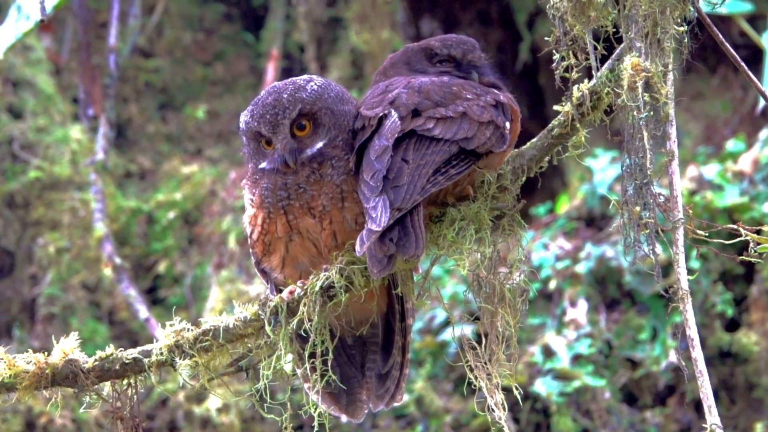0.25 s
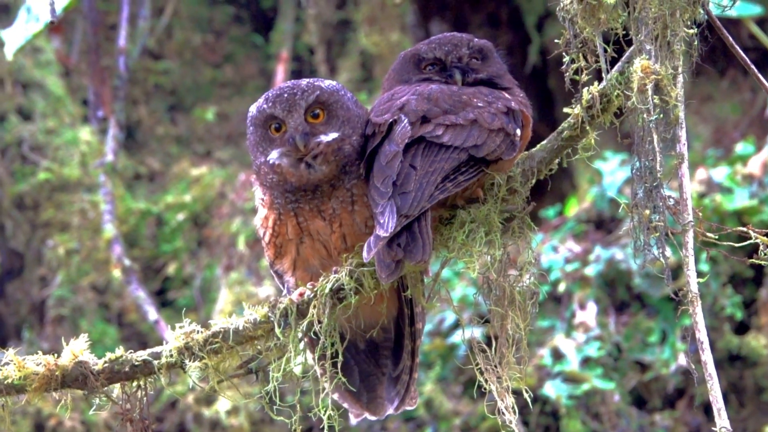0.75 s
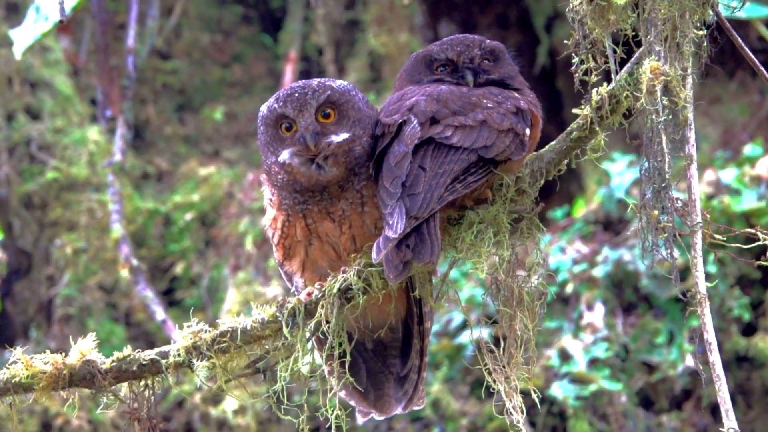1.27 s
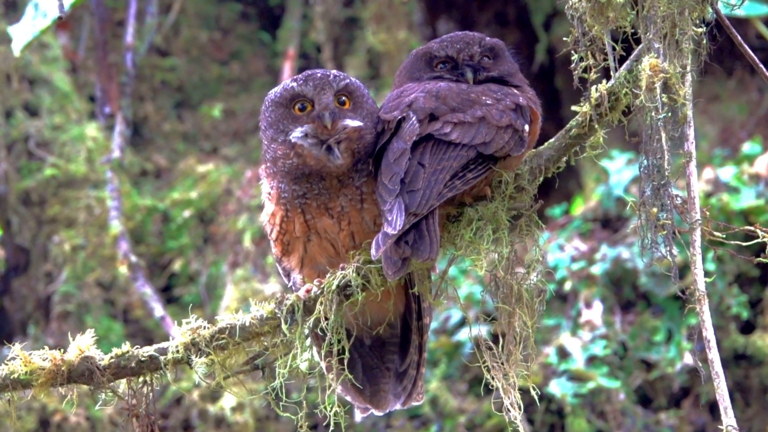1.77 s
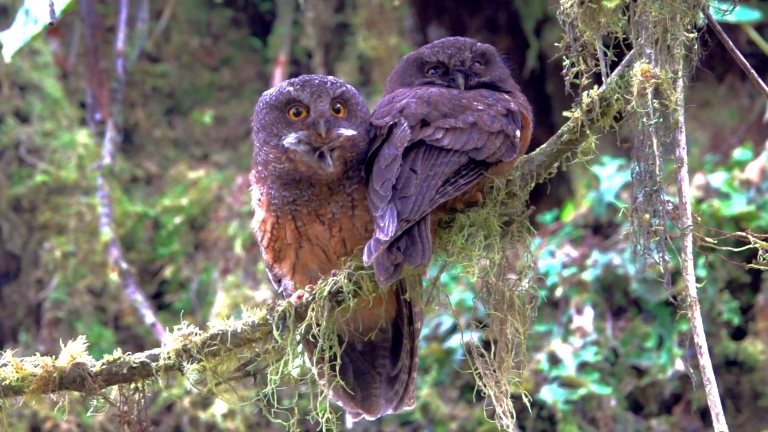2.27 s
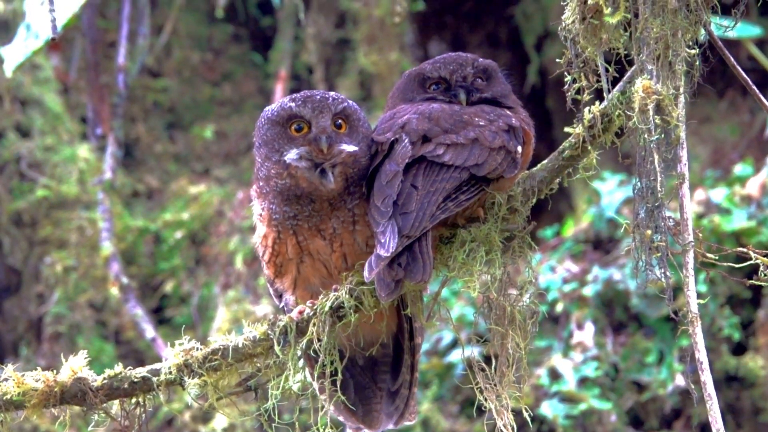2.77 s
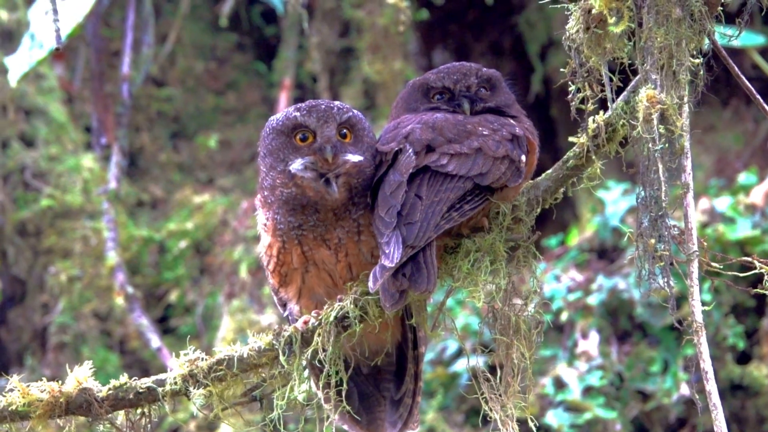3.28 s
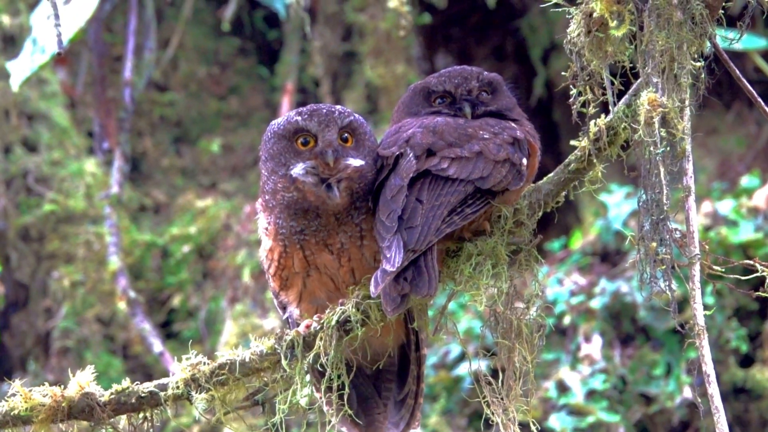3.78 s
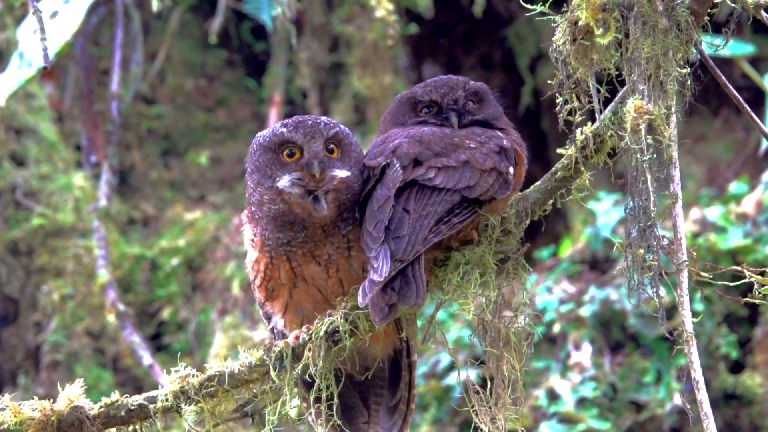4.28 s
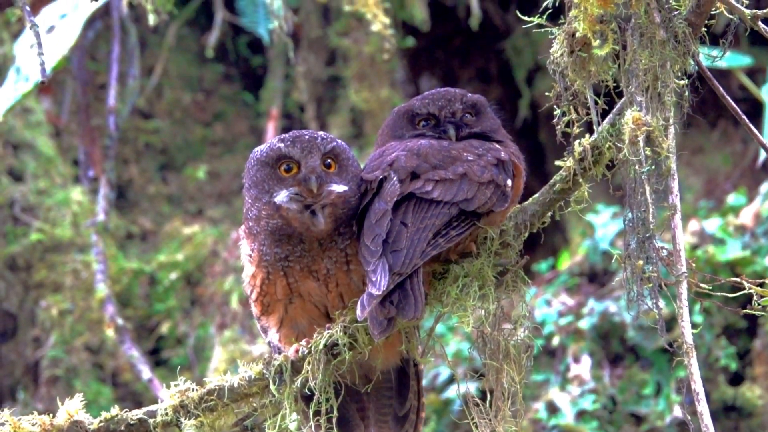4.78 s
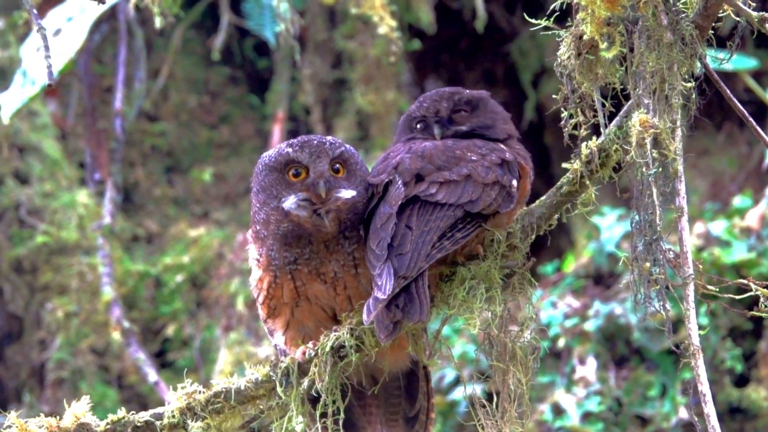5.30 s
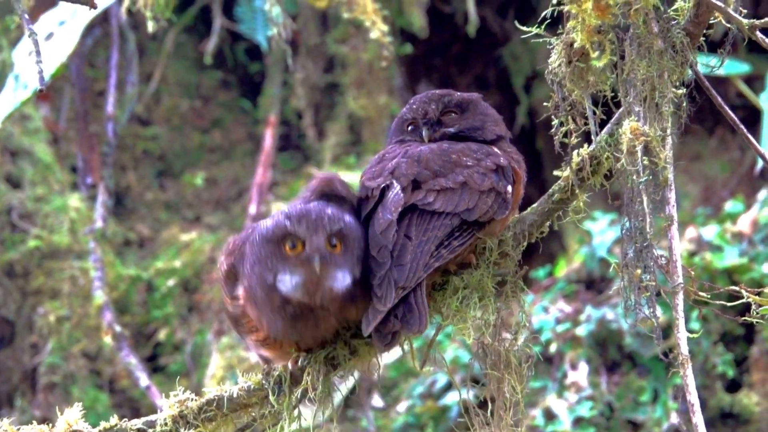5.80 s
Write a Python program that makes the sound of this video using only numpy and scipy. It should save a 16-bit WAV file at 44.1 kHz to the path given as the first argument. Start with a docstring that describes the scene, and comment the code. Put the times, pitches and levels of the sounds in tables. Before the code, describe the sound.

In a quiet forest, a short rustle with small dry knocks opens the scene. A small owl then begins soft, hollow double hoots, about four pairs a second, growing steadily louder and holding strong. Early on, a distant bird adds very high thin whistles and buzzy chips. The hoots end with one weak single note. Heard fairly close outdoors, with slight echoes from the trees.

```python
"""A steady forest wash with two fuzzy low hums opens under shaped-noise rustles, decaying knocks and clicks.
A small owl enters with a series of double hoots that grows louder: gliding sines that crack into a second
tone, with echoes and scatter. Around its first hoots a far bird adds buzzy chips of filtered noise and thin
wavering sine whistles. The owl ends on one soft single note; after it come a faint rustle and
the bird's last chips and whistle over the forest."""
import sys
import numpy as np
from scipy import signal
from scipy.io import wavfile
from scipy.ndimage import uniform_filter1d

SR = 44100
rng = np.random.default_rng(int(sys.argv[2]) if len(sys.argv) > 2 else 0)


def store_wav(level_fs):
    """Save 16-bit WAV to argv[1]."""
    pcm = np.round(np.clip(np.atleast_2d(level_fs), -1, 1) * 32767)
    wavfile.write(sys.argv[1], SR, pcm.T.astype(np.int16))


N = 266716  # length in samples


def amp(db):
    """Turns dB into an amplitude factor."""
    return 10 ** (np.asarray(db) / 20)


def evened(x):
    """Scales a signal to an rms of one."""
    return x / np.sqrt(np.mean(x ** 2) + 1e-20)


def read(points, hz):
    """Reads a curve of (f/Hz, value) points, interpolated along log frequency."""
    f, value = np.transpose(points)
    return np.interp(np.log(hz + 1), np.log(f + 1), value)


def add(mix, s, sound, pan_db=0):
    """Lays a sound into both channels at s seconds; positive pan_db leans left."""
    part = mix[:, round(s * SR):][:, :np.shape(sound)[-1]]
    panned = sound * amp([[pan_db / 2], [-pan_db / 2]])
    part += panned[:, :part.shape[1]]


def tone(hz):
    """A sine that follows a pitch curve by summing its phase."""
    return np.sin(2 * np.pi * np.cumsum(hz) / SR)


def highpass(x, order, hz):
    """Butterworth bass cut."""
    return signal.sosfilt(signal.butter(order, hz, "high", fs=SR, output="sos"), x)


def hiss(gain, same, patchy_db):
    """Two-channel noise from random short-time spectra with drifting patches, at an rms of one."""
    hz = np.fft.rfftfreq(1024, 1 / SR)
    a, b, c, d, patches = rng.standard_normal((N // 256 + 5, 513, 5)).T
    patches = uniform_filter1d(patches, size=12, axis=0)  # smooth along frequency
    patches = evened(uniform_filter1d(patches, size=14, axis=1))  # smooth along time
    likeness = np.clip(same(hz), -1, 1)[:, None]
    left = a + 1j * b
    right = likeness * left + np.sqrt(1 - likeness ** 2) * (c + 1j * d)
    spectra = np.array([left, right]) * gain(hz)[:, None] * amp(patchy_db * patches)
    return evened(signal.istft(spectra, nperseg=1024, noverlap=768)[1][:, :N])


def tail(x, t60, same):
    """Scatter among the trees: sparse taps of random sign that die away by 60 dB in t60 seconds."""
    taps, t = np.zeros((2, SR)), np.arange(SR) / SR
    at = np.arange(400, SR - 20, 20) + rng.integers(0, 20, (2, (SR - 401) // 20))
    np.put_along_axis(taps, at, rng.choice([-1., 1.], at.shape), 1)
    shared = same * taps[0]
    separate = np.sqrt(1 - same ** 2) * taps * [[1], [-1]]
    taps = (shared + separate) * amp(-60 * t / t60)
    return signal.fftconvolve(x, taps / np.linalg.norm(taps[0]), axes=1)[:, :N]


# tone colour of the forest wash: (f/Hz, relative level/dB per Hz)
FOREST_COLOUR = [(30, -30), (62, -36), (120, -31), (250, -21), (400, -17), (500, -5), (700, -4), (1000, -5),
                 (1300, -12), (1600, -15), (2000, -19.5), (3200, -21), (6000, -22), (10000, -23.5),
                 (16000, -27)]
# stereo likeness of the forest: (f/Hz, left-right correlation)
FOREST_LIKENESS = [(60, 0.6), (250, 0.93), (550, 0.686), (1650, 0.28), (4970, 0.26), (9000, 0.167),
                   (15000, 0.49)]


def forest_likeness(hz):
    """Left-right likeness of the background at each frequency."""
    return read(FOREST_LIKENESS, hz)


def forest_wash():
    """A steady broad wash: coloured noise with slow patches in time and frequency."""
    return amp(-63.5) * hiss(lambda hz: amp(read(FOREST_COLOUR, hz)), forest_likeness, patchy_db=2.0)


# steady fuzzy tones: (f/Hz, full width at half amplitude/Hz, rms level/dB)
FOREST_HUMS = [(575.3, 29, -71), (867, 28, -74.5)]


def forest_hums():
    """Fuzzy low tones: noise gathered into narrow resonance-shaped peaks."""
    out = np.zeros((2, N))
    for f, width, db in FOREST_HUMS:
        peak = lambda hz: 1 / (1 + (2 * (hz - f) / width) ** 2)
        out += amp(db) * hiss(peak, forest_likeness, patchy_db=-0.5)
    return out


# one row a rustle: (t/s, rise/s, fall/s, peak level/dB before the grain gain, left-right balance/dB)
RUSTLE_SWELLS = [(0, 0.00067, 0.76, -59, 3), (3.392, 0.046, 0.046, -72.5, 2.5),
                 (4.595, 0.019, 0.11, -62.5, 2), (4.65, 0.023, 0.15, -61, 1), (5.863, 0.0136, .12, -83, -8)]
# tone colour of the rustling: (f/Hz, relative level/dB per Hz)
RUSTLE_COLOUR = [(59, -75), (100, -94), (322, -6.5), (442, -15), (535, -5.5), (662, -3), (872, -1.5),
                 (1310, -1.5), (2630, -11), (10700, -13), (16000, -19)]
RUSTLE_FADE_DB, RUSTLE_BEND = -27.5, 1.65  # depth and curve of rise and fall


def rustles():
    """Wide grainy noise in short swells."""
    likeness = [(300, 1.0), (2000, 0.27), (8000, 0.34)]  # (f/Hz, left-right correlation)
    noise = hiss(lambda hz: amp(read(RUSTLE_COLOUR, hz)), lambda hz: read(likeness, hz), patchy_db=2.0)
    grain_db = 1.32 * evened(uniform_filter1d(rng.standard_normal(N), size=120))  # fast level flutter
    noise = noise * amp(9.0 + grain_db)
    out = np.zeros((2, N))
    for s, rise, fall, db, pan_db in RUSTLE_SWELLS:
        t = np.arange(0, rise + fall, 1 / SR)
        away = np.interp(t, [0, rise, t[-1]], [1, 0, 1])  # 0 at the peak, 1 at both ends
        grain = noise[:, rng.integers(N // 2):][:, :len(t)]
        add(out, s, grain * amp(db + RUSTLE_FADE_DB * away ** RUSTLE_BEND), pan_db)
    return out


def tick_scatter(direct):
    """Adds a short, wide tail to the ticks and clicks."""
    return direct + amp(-10) * tail(direct, t60=0.14, same=0.28)


# one row a knock: (t/s, level/dB of the lowest mode before rise and decay, f/Hz, left-right balance/dB)
KNOCKS = [(0.034, -40, 1390, 9), (0.09, -44.5, 1380, 13), (0.131, -41.5, 1175, 9.5), (0.177, -43, 1970, 17),
          (0.215, -35.5, 1260, 10.5), (0.276, -34.5, 1090, 10), (0.46, -49.5, 902, 4),
          (0.489, -51.5, 1486, 14.5), (0.507, -49, 1125, 12.5), (0.544, -40.5, 1440, 11),
          (1.7714, -59, 2270, -17), (1.7884, -71, 2350, -1), (1.8018, -59, 3104, -14)]


def knocks():
    """Small dry knocks: three inharmonic modes that die away by 60 dB in 12 ms."""
    out, t = np.zeros((2, N)), np.arange(600) / SR
    for s, db, hz, pan_db in KNOCKS:
        ring = np.sin(2 * np.pi * hz * t)
        ring += .5 * np.sin(2 * np.pi * 1.41 * hz * t)
        ring += 0.066 * np.sin(2 * np.pi * 4.4 * hz * t)
        add(out, s, amp(db - 60 * t / 0.012) * ring * np.minimum(t / 0.00072, 1), pan_db)
    return tick_scatter(out)


# one row a thin click: (t/s, level/dB before gain and filter, left-right balance/dB)
THIN_CLICKS = [(0.2764, -45.5, 9), (1.407, -76, -7.5), (3.0645, -62, -8), (4.3156, -56, -10.5),
               (4.348, -58.5, -10), (4.6174, -53, 6.5)]


def clicks():
    """Thin clicks: band-passed noise that dies away by 60 dB in 12 ms."""
    out, t = np.zeros((2, N)), np.arange(600) / SR
    band = signal.butter(1, [1500, 9000], "band", fs=SR, output="sos")
    for s, db, pan_db in THIN_CLICKS:
        burst = signal.sosfilt(band, rng.standard_normal(len(t)))
        add(out, s, amp(db + 6.0 - 60 * t / 0.012) * burst, pan_db)
    return tick_scatter(out)


def voice(hz, level):
    """A sine with a weak octave that the throat favours near 1500 Hz and that swells less than the note."""
    favour = 1 / (1 + ((2 * hz - 1500) / 160) ** 2)
    return level * tone(hz) + amp(-29) * level ** .5 * favour * tone(2 * hz)


START_HZ, END_HZ, SWELL_DB = 623.2, 539, 19  # every note rises from and sinks to the same slack pitches
SLIDE_S, HOLD, CRACK_END_DB = 0.039, 1.362, -15  # cracked voice: longest slide, its power, level at its end


def note(length, top_hz, db, top, crack, change_db, cracked_hz, cracked_db):
    """Effort lifts pitch and level in one arch; at the crack a second tone flicks out and slides down."""
    u = np.arange(0, length, 1 / SR) / length  # place in the note, 0-1
    top, crack = np.clip([top, crack], .05, .95)
    rising, sinking = np.sin(np.pi / 2 * u / top), np.cos(np.pi / 2 * (u - top) / (1 - top))
    effort = np.where(u < top, rising, sinking)
    hz = np.where(u < top, START_HZ, END_HZ) * (1 - effort) + top_hz * effort

    since = np.maximum(u - crack, 0) * length  # seconds after the crack
    slide = np.clip((u - crack) / min(1 - crack, SLIDE_S / length), 0, 1)
    cracked = np.minimum(since / 0.002, 1)
    flick_hz = 60 * np.exp(-since / 0.0032)
    high_hz = END_HZ + (cracked_hz - END_HZ) * np.cos(np.pi / 2 * slide ** HOLD) + flick_hz
    high_db = cracked_db + (CRACK_END_DB - cracked_db) * slide ** 3.3

    low = voice(hz, amp(SWELL_DB * (effort - 1) + change_db * cracked))
    # the new tone starts against the swing of the old one, so the level dips as they cross
    high = -cracked * voice(np.where(u < crack, hz, high_hz), amp(high_db))
    edges = np.clip(np.minimum(u / 0.0046, (1 - u) / 0.0043) * length, 0, 1)  # rise/s and fall/s
    return amp(db) * (low + high) * edges


# one row a note: (t/s, length/s, top f/Hz, level/dB before crack and bass cut, place of the top 0-1,
#   place of the crack 0-1, change of the low voice there/dB, cracked voice f/Hz without the flick,
#   its starting level/dB re note)
HOOT_NOTES = [(0.709, 0.06, 750, -55.5, .58, .32, 1.5, 871, 1),
              (0.79, 0.078, 736, -50, 0.53, 0.43, -2.5, 760, -5),
              (0.928, 0.064, 808, -41.5, 0.63, 0.56, -9, 848, -2),
              (1.018, 0.067, 769, -41.5, .7, 0.68, -12, 912, -12),
              (1.154, 0.075, 789, -42, 0.44, 0.51, 1.5, 1048, -11),
              (1.239, 0.0762, 742, -44.5, 0.42, .43, -7.5, 762, -0.5),
              (1.383, 0.056, 790, -39.5, 0.64, 0.53, -16, 875.4, -1.5),
              (1.462, 0.073, 741, -43, 0.49, 0.46, -5.5, 755, -2.5),
              (1.618, .066, 828, -39.5, 0.57, 0.36, -0.5, 1046, -10.5),
              (1.702, 0.062, 828, -37.5, 0.71, 0.65, -15, 761, -11),
              (1.852, 0.069, 824, -37.5, .5, .47, -4.5, 1029, -10.5),
              (1.934, 0.0589, 789, -38.5, 0.65, .76, 2.5, 938, -15),
              (2.089, 0.074, 790, -37.5, 0.5, 0.42, -2, 1043, -10),
              (2.174, 0.061, 780, -37, 0.63, .8, 0, 840, -24.5),
              (2.333, 0.067, 815, -34.5, .61, 0.56, -4.5, 863, -10),
              (2.413, 0.067, 779, -35.5, 0.6, 0.55, -6.5, 887, -27),
              (2.575, 0.08, 814.5, -35, .45, 0.46, -7, 1078, -15.5),
              (2.655, 0.059, 837, -34, 0.79, .72, -16, 753, -6),
              (2.82, 0.066, 821, -34.5, 0.59, 0.59, -4.5, 943, -4.5),
              (2.896, 0.087, 811, -33.5, 0.66, 0.59, -11.5, 908, -18.5),
              (3.068, 0.073, 817.6, -33, 0.51, 0.68, -11, 882, -3.5),
              (3.148, 0.06, 783.4, -34, 0.67, 0.88, 0, 752, -9.5),
              (3.32, 0.073, 833.3, -34, 0.39, 0.55, -7.5, 916, -3),
              (3.401, 0.057, 872, -32, 0.76, 0.68, -9, 845, -0.5),
              (3.569, 0.076, 829, -34, 0.4, 0.49, -1.5, 1054, -9.5),
              (3.644, 0.073, 785.4, -36.5, 0.55, 0.39, 0.5, 804, -9.5),
              (3.828, 0.066, 836, -31.5, 0.58, .64, -3.5, 1021, -10),
              (3.905, 0.059, 826.5, -32.5, 0.71, 0.52, -5.5, 871, -4.5),
              (4.08, 0.084, 816.4, -33, 0.48, 0.44, -9, 1039, -6),
              (4.16, 0.07, 794, -34, 0.55, 0.88, 5.5, 810, -8.5),
              (4.34, 0.0753, 842, -32.5, 0.51, .44, -14, 846, 0),
              (4.414, 0.074, 789, -33.5, 0.52, 0.56, 0.5, 800, -21),
              (4.599, 0.08, 816.5, -32.5, 0.48, 0.48, -6, 1041, -6.5),
              (4.671, 0.0737, 814, -34, .69, .56, -1, 811, 4),
              (4.874, 0.076, 838, -32, 0.53, .5, -6.5, 1024, -7),
              (4.953, 0.072, 794.4, -32, 0.53, 0.74, 0.5, 866, -23),
              (5.144, 0.079, 846, -32, .5, .5, -12, 928, 0),
              (5.224, 0.072, 811, -32, 0.64, .46, -9.5, 779, -4),
              (5.413, .081, 852.6, -32, 0.55, 0.46, -2.5, 858, 3.5),
              (5.499, .067, 831.5, -30.5, 0.73, 0.66, -31, 836, -5.5),
              (5.729, .064, 702, -42, 0.56, 0.81, -15, 1260, -18)]
# ground and trunks: (delay t/s, level/dB re direct)
FIRST_ECHOES = [(.011, -24.5), (.024, -16), (.037, -24), (.062, -21.5)]


def owl():
    """The hoots, their first echoes from alternating sides and the scatter."""
    direct = np.zeros((2, N))
    for s, *row in HOOT_NOTES:
        add(direct, s, note(*row), pan_db=-0.5)
    direct = highpass(direct, 4, 420)  # a small throat gives no bass
    out = direct + amp(-11.5) * tail(direct, t60=0.24, same=0.698)
    for k, (delay, db) in enumerate(FIRST_ECHOES):
        add(out, delay, amp(db) * direct, pan_db=4.5 * (-1) ** k)
    return out


def far_scatter(direct):
    """Half drowns the far bird in its own scatter."""
    return amp(-3) * direct + amp(-2.0) * tail(direct, t60=0.18, same=0.093)


# one row a buzzy chip: (t/s, length/s, centre f/Hz, width/Hz, starting level/dB before rise and scatter)
BIRD_CHIPS = [(0.713, 0.15, 7600, 1800, -66), (0.922, 0.209, 7450, 1290, -67),
              (1.101, 0.24, 7000, 595, -71), (1.43, 0.12, 7230, 720, -69), (5.771, 0.092, 2940, 508, -69.5),
              (5.888, 0.14, 6800, 1800, -72)]


def far_chips():
    """Buzzy chips: band-passed noise that sinks by 9 dB over each chip."""
    direct = np.zeros((2, N))
    for s, length, hz, width, db in BIRD_CHIPS:
        t = np.arange(0, length, 1 / SR)
        band = signal.butter(2, [hz - width / 2, hz + width / 2], "band", fs=SR, output="sos")
        buzz = evened(signal.sosfilt(band, rng.standard_normal(len(t))))
        add(direct, s, amp(db - 9 * t / length) * buzz * np.minimum(t / 0.0078, 1), pan_db=-2)
    return far_scatter(direct)


# one row a whistle: (t/s, length/s, centre f/Hz, starting rms level/dB before rise and scatter)
BIRD_WHISTLES = [(.9, 0.24, 7550, -64.5), (.88, 0.24, 6040, -70), (1.083, 0.14, 7260, -61),
                 (1.197, 0.144, 7107, -62), (1.288, .14, 7293, -59), (1.416, 0.217, 7340, -64),
                 (1.56, 0.19, 7100, -65.5), (1.681, 0.1546, 7044, -56), (1.839, 0.16, 7270, -67),
                 (1.954, 0.17, 7190, -65), (1.938, 0.23, 6940, -67), (2.2, 0.14, 7160, -71),
                 (2.394, 0.194, 7380, -67), (3.625, 0.17, 3970, -77), (5.9, 0.144, 6260, -74.5)]
WHISTLE_RISE_S, WHISTLE_FADE_DB, WAVER_HZ = 0.011, -17.5, 59  # waver is rms


def far_whistles():
    """Thin fading whistles: sines whose pitch wavers with smoothed noise."""
    direct = np.zeros((2, N))
    for s, length, hz, db in BIRD_WHISTLES:
        t = np.arange(0, length, 1 / SR)
        waver = evened(uniform_filter1d(rng.standard_normal(len(t)), size=150))
        level = amp(db + WHISTLE_FADE_DB * t / length) * np.minimum(t / WHISTLE_RISE_S, 1) ** 2
        whistle = np.sqrt(2) * tone(hz + WAVER_HZ * waver)
        add(direct, s, level * whistle * signal.windows.tukey(len(t), .1), pan_db=2.5)
    return far_scatter(direct)


def scene():
    """All layers together, in order of entry."""
    background = forest_wash() + forest_hums()
    near = rustles() + knocks() + clicks()
    return background + near + owl() + far_chips() + far_whistles()


def record(dry):
    """The microphone loses the bass; then the recorder's band limit cuts the top treble."""
    thin = highpass(dry, 2, 150)
    lowpass = signal.firwin(511, 15800, window=("kaiser", 9), fs=SR)  # edge in Hz
    return signal.oaconvolve(thin, lowpass[None], "same")


dry = scene()
out = record(dry)
store_wav(out)
```